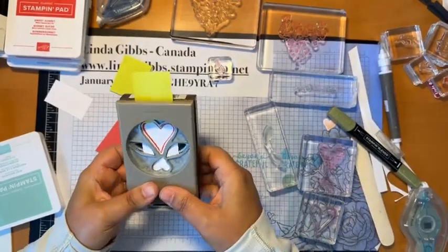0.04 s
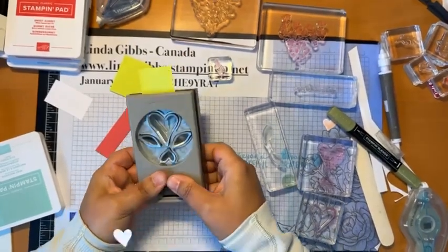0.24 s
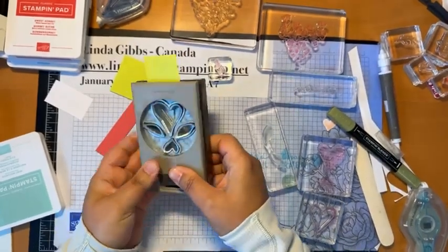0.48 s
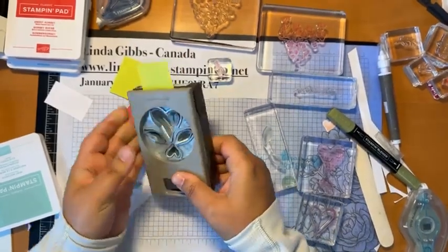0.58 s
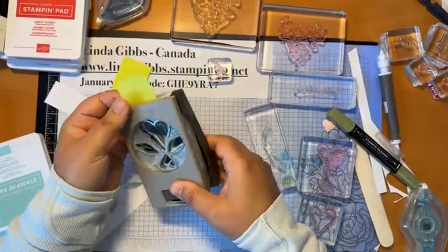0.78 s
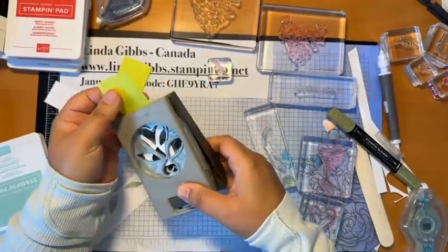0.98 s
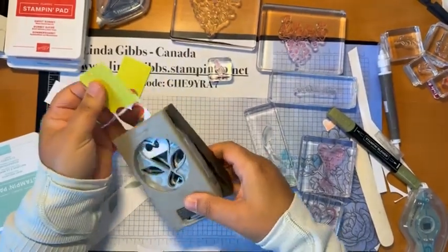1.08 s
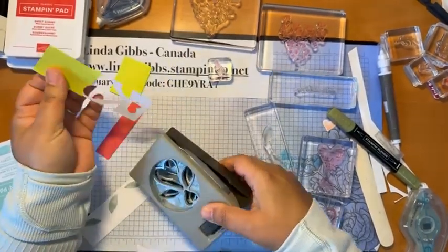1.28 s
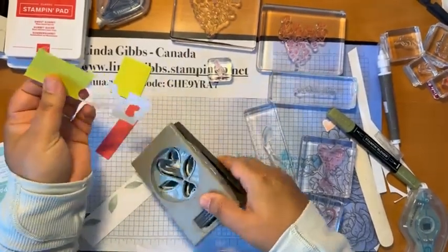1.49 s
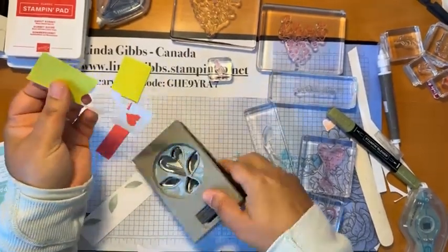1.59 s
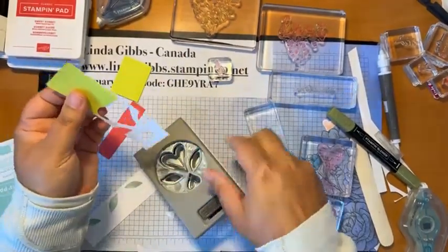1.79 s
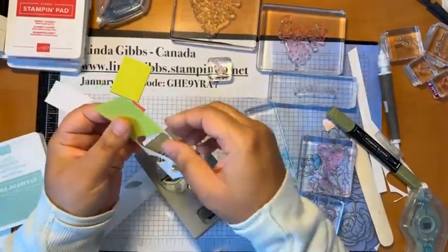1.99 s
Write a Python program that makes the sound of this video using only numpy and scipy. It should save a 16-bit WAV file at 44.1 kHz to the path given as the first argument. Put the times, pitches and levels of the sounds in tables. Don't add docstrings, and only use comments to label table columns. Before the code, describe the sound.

Close to a phone microphone in a small room, a hand punch clicks faintly and snaps hard through cardstock, card rustles out with small ticks, and the tool is set down on wood with low thuds.

```python
import sys
import numpy as np
from scipy import signal
from scipy.fft import rfft, irfft
from scipy.io import wavfile
from scipy.ndimage import uniform_filter1d

SR = 44100
rng = np.random.default_rng(int(sys.argv[2]) if len(sys.argv) > 2 else 0)


def master(y):
    cut = np.clip(np.atleast_2d(y).T, -1, 1)
    pcm = np.round(cut * 32767)
    wavfile.write(sys.argv[1], SR, pcm.astype(np.int16))


def magnitude_from_level(level_db):
    exponent = np.asarray(level_db, float) / 20
    return 10 ** exponent


N = 90404
T = np.arange(N) / SR

# pitch_hz [Hz], level_db [dB per Hz]
SNAP_COLOUR = [(80, -39), (260, -18), (600, -9), (2500, -4), (6500, -7.5), (9500, -20), (12500, -16.5),
               (16000, -20)]
# pitch_hz [Hz], level_db [dB], time to fall 60 dB t60_s [s]
BODY_TONES = [(624, -8.5, 0.036), (895.7, -2.5, 0.16), (1222, -6.5, 0.051), (1393, -4.5, .05),
              (1754, -1.5, 0.066), (2106, -6.5, 0.068), (2434, 1.5, .08), (2548, 3.5, 0.098),
              (2843, -9.5, 0.12), (3535, -4.5, 0.06), (3470, -3.5, 0.059), (3827, 0, 0.074), (5220, 0, .06),
              (7370, -15, .05)]
BODY_RING_DB = -11.5


def unit(x):
    return x / np.sqrt(np.mean(x ** 2))


def curve(table, hz):
    table = np.array(table, float)
    return np.interp(np.log(np.maximum(hz, 1)), np.log(table[:, 0]), table[:, 1])


def colour(x, table, size=2048):
    hz = np.arange(size // 2 + 1) * SR / size
    cepstrum = irfft(np.log(magnitude_from_level(curve(table, hz))))
    cepstrum[1:size // 2] *= 2
    cepstrum[size // 2 + 1:] = 0
    response = irfft(np.exp(rfft(cepstrum)))
    response = response / np.sqrt(np.sum(response ** 2))
    return signal.fftconvolve(x, response)[:len(x)]


def ring(x, tones):
    t = T[:SR // 2]
    response = np.zeros(len(t))
    for hz, db, t60 in tones:
        response += magnitude_from_level(db - 60 * t / max(t60, .005)) * np.sin(2 * np.pi * hz * t)
    return signal.fftconvolve(x, response / np.sqrt(np.sum(response ** 2)))[:N]


def band(x, hz, width):
    b, a = signal.iirpeak(hz, hz / width, SR)
    return signal.lfilter(b, a, signal.lfilter(b, a, x))


def grains(per_s, spread_db):
    chance, side, size = rng.random((3, N))
    clicks = (chance < per_s / SR) * np.sign(side - .5)
    return unit(clicks * magnitude_from_level(-spread_db * np.log(1 - size)))


def walk(count):
    step = SR // count
    turns = rng.standard_normal(N // step + 1)
    return unit(uniform_filter1d(np.repeat(turns, step)[:N], step))


def swell(s, db, rise, fall):
    return magnitude_from_level(db + 20 * np.minimum((T - s) / rise, (s - T) / fall))


def lever(bursts, spectrum, tones, ring_db):
    fall_db_s = 1900.5
    env = np.zeros(N)
    for s, db, rise_db_s, hold in bursts:
        rise = rise_db_s * np.minimum(T - s, 0)
        fall = fall_db_s * np.maximum(T - s - hold, 0)
        env += magnitude_from_level(db + rise - fall)
    slips = env * grains(per_s=22000, spread_db=1.6)
    crack = (np.arange(N) == np.argmax(env)) * np.sqrt(np.sum(env ** 2))
    return np.array([colour(x, spectrum) + magnitude_from_level(ring_db) * ring(x, tones) for x in (slips, crack)])


def background():
    floor_colour = [(30, -13), (60, -1.5), (120, 3), (400, -12), (1500, -15), (3000, -24.5), (9000, -29),
                    (16000, -36)]
    level_db = -79.5 + 1.7 * walk(count=6)
    return colour(rng.standard_normal(N), floor_colour, size=8192) * magnitude_from_level(level_db)


def shear():
    # start_s (peak) [s], level_db [dB], rise [dB per s], hold_s [s]
    tears = [
        (.004, -55, 2970, .003),
        (.0075, -39, 8874, .003),
        (.237, -43.5, 1679, 0.003),
        (.2418, -27.5, 5007, .001),
        (.2447, -22.5, 6000, 0.0037),
    ]
    near, _ = lever(tears, SNAP_COLOUR, BODY_TONES, BODY_RING_DB)
    return signal.sosfilt(signal.butter(4, 7900, fs=SR, output="sos"), near)


def creak():
    # start_s (peak) [s], level_db [dB], rise [dB per s], hold_s [s]
    creaks = [
        (.0105, -35.5, 9000, 0.004),
        (.018, -37, 4000, 0.0044),
    ]
    creak_colour = [(60, -42), (250, -6.5), (700, -9.5), (1150, 2), (2300, -3.5), (5300, -16.5),
                    (9000, -24), (16000, -25)]
    # pitch_hz [Hz], level_db [dB], time to fall 60 dB t60_s [s]
    lever_tones = [(1134, -2.5, .12), (1247, -0.5, 0.14), (1330, -10.5, 0.068), (2020, -4, 0.037),
                   (2020, -4, 0.035), (2310, -7, .04), (2465, -1.5, 0.05), (5200, -8, .04)]
    return lever(creaks, creak_colour, lever_tones, ring_db=-4)


def knocks():
    # start_s [s], level_db [dB], contact_s [s], crack_db [dB]
    contacts = [(0.012, -67, 0.0078, -86), (0.253, -71, 0.013, -64), (0.411, -70.5, 0.004, -89),
                (1.462, -57.5, 0.0065, -62), (1.47, -53, 0.0097, -74), (1.52, -57.5, 0.011, -71),
                (1.595, -49, 0.002, -49), (1.603, -34.5, 0.0035, -79), (1.614, -44, 0.002, -56),
                (1.649, -67, 0.0027, -57.5), (1.688, -82, 0.0023, -71), (1.7777, -40, 0.0026, -32),
                (1.783, -28, 0.003, -41.5), (1.795, -61, 0.0038, -37.5), (1.813, -36, 0.0046, -45.5),
                (1.832, -36.5, 0.0035, -42.5), (1.859, -51.5, 0.00088, -51), (1.892, -77, 0.0021, -57)]
    # pitch_hz [Hz], level_db [dB], time to fall 60 dB t60_s [s]
    table_tones = [(69.4, -19.5, 0.073), (91, -21, 0.022), (115, -3, 0.045), (142, -4.5, 0.24),
                   (177, -1, 0.062), (211, -2, 0.095), (257, 3, 0.048), (333, -4, 0.095),
                   (450, -0.5, 0.083), (536, -4.5, 0.11), (718.7, -6, 0.11), (930, -0.5, 0.064)]
    crack_colour = [(150, -9.5), (350, 0.5), (750, -6), (1300, -16.5), (4000, -25), (6500, -34),
                    (9000, -53.5), (16000, -59)]
    push, crack = np.zeros(N), np.zeros(N)
    for s, db, contact, crack_db in contacts:
        phase = np.clip((T - s) / max(contact, .0005), 0, 1)
        push += magnitude_from_level(db) * np.sin(np.pi * phase) ** 2
        crack += swell(s, crack_db, rise=.002, fall=.08 / 3)
    rough = crack * grains(per_s=6100, spread_db=1.0)
    return ring(push, table_tones) + colour(rough, crack_colour)


def rub():
    # start_s (peak) [s], level_db [dB], swell_s [s], fade_s [s], brightness [0-1]
    strokes = [(.145, -68, 0.044, 0.054, 0.56), (0.2, -58.5, 0.021, 0.13, 0.54),
               (0.494, -59, 0.0097, 0.11, 0.9), (0.537, -63, 0.0088, 0.041, 0.17),
               (0.651, -74, 0.027, 0.037, 0.97), (0.733, -58, 0.079, 0.051, 0.96),
               (0.868, -62, 0.054, 0.13, 0.48), (0.933, -52.5, 0.05, 0.032, 0.91),
               (0.985, -55.5, 0.015, 0.044, 0.1), (1.087, -58, 0.065, 0.17, 0.93),
               (1.14, -57, 0.037, 0.078, 0.67), (1.259, -64.5, 0.019, 0.061, 0.21),
               (1.291, -68, 0.051, 0.063, 0.98), (1.358, -62.5, 0.058, 0.037, 0.69),
               (1.435, -74.5, 0.01, 0.044, 0.93), (1.584, -68, 0.005, 0.11, 0.84),
               (1.772, -67.5, 0.056, 0.071, 0.51), (1.918, -68, 0.0051, 0.043, 0.45),
               (1.969, -71, 0.013, 0.12, 0)]
    rub_colour = [(100, -5.5), (900, -2.5), (2000, 0.5), (3200, 0.5), (6500, -2), (9800, -6), (12500, -2.5),
                  (15800, -9)]
    # pitch_hz [Hz], width_hz [Hz], level_db [dB]
    slot_peaks = [
        (1900, 1800, -15),
        (4620, 3000, -8.5),
        (6000, 280, -20),
    ]
    scrape = grains(per_s=9000, spread_db=2.5)
    plain = colour(scrape, rub_colour)
    peaks = []
    for hz, width, db in slot_peaks:
        wander = magnitude_from_level(db + 0.86 * walk(count=9))
        peaks.append(unit(band(scrape, hz, width)) * wander)
    high, low = np.zeros(N), np.zeros(N)
    for s, db, rise, fade, brightness in strokes:
        env, share = swell(s, db, rise, fade), np.clip(brightness, 0, 1)
        high += env * share
        low += env * (1 - share)
    bright = plain + sum(peaks[1:])
    dull = signal.sosfilt(signal.butter(2, 6000, fs=SR, output="sos"), plain) + 2 * peaks[0]
    flicker = magnitude_from_level(1.3 * walk(count=60))
    return (high * bright + low * dull) * flicker


def snap():
    # start_s (peak) [s], level_db [dB], rise [dB per s], hold_s [s]
    breaks = [
        (.234, -56, 1500, .008),
        (.2495, -15.5, 5000, 0.00064),
        (.2511, -13.5, 6000, 0.0006),
        (.2575, -27, 6000, 0.00057),
        (.2618, -27, 6000, .0005),
        (.2657, -24, 6000, 0.00059),
        (.2745, -25.5, 5000, 0.0023),
    ]
    return lever(breaks, SNAP_COLOUR, BODY_TONES, BODY_RING_DB)


def ticks():
    catches = [(0.4883, -41.5, 6000), (.4954, -48, 4860), (.5034, -43.5, 6880), (0.5349, -46.5, 1447),
               (0.5426, -56, 1390), (.5544, -50, 4880), (0.594, -50.5, 5320), (0.642, -51.5, 6760),
               (.656, -55, 5200), (.6833, -53, 5470), (.847, -56, 1800), (.9118, -44.5, 4700),
               (1.0864, -48, 5330), (0.7325, -53, 1860), (0.9347, -47, 1550), (1.1334, -47, 1900),
               (1.1404, -40.5, 1900), (1.2565, -46.5, 1830), (1.2575, -58, 3306), (1.3577, -45, 5310)]
    out, t = np.zeros(N), T[:SR // 40]
    for s, db, hz in catches:
        burst = rng.standard_normal(len(t)) * magnitude_from_level(-60 * t / .015)
        click = band(burst, hz, width=hz * .5)
        i = int(s * SR)
        out[i:i + len(t)] += click / np.abs(click).max() * magnitude_from_level(db - 2)
    return out


def squeaks():
    rubs = [
        (.73, -69, 1763, 0.17, 0.15),
        (.865, -68, 1845, 0.084, 0.1),
        (1.11, -62, 5200, 0.11, .08),
        (1.14, -67.5, 2230, 0.085, .1),
        (1.14, -63, 370.5, 0.01, 0.06),
        (1.257, -75, 326.5, 0.035, 0.1),
        (1.975, -70.5, 4370, 0.037, 0.082),
        (1.969, -72, 2105, .02, 0.12),
    ]
    noise = rng.standard_normal(N)
    return sum(swell(s, db, rise, fall) * unit(band(noise, hz, hz / 12)) for s, db, hz, rise, fall in rubs)


def corners():
    touches = [(1.456, -66, 2190, 1990, .1), (1.4585, -52.5, 882, 201.8, 0.19), (1.46, -57, 450, 403, 0.18),
               (1.493, -68, 900, 252, 0.064), (1.503, -72.5, 930, 200, 0.065),
               (1.595, -57, 1310, 1090, 0.2), (1.7756, -49, 2200, 900, .06), (1.78, -46, 3994, 2000, 0.036),
               (1.796, -57.5, 2600, 1200, 0.064), (1.822, -53, 1995, 900, 0.067),
               (1.96, -66, 590, 704, 0.41)]
    noise = rng.standard_normal(N)
    out = np.zeros(N)
    for s, db, hz, width, t60 in touches:
        out += swell(s, db, rise=.002, fall=t60 / 3) * unit(band(noise, hz, width))
    return out


def hum():
    hums = [
        (1.733, -50, 110, 0.049, 0.071),
        (1.949, -47, 115, 0.036, 0.1),
        (1.993, -55, 115, 0.02, 0.031),
    ]
    return sum(swell(s, db, rise, fall) * np.sin(2 * np.pi * hz * T) for s, db, hz, rise, fall in hums)


def room(x):
    room_t60 = [(100, 0.27), (500, 0.27), (1000, 0.3), (6000, 0.31), (15000, 0.22)]
    delay_s = 0.0034
    t = T[:SR // 2]
    tail = np.zeros(len(t))
    for hz in 60 * 2. ** np.arange(0, 8.1, .5):
        sos = signal.butter(2, [hz / 2 ** .25, hz * 2 ** .25], "band", fs=SR, output="sos")
        noise = signal.sosfilt(sos, rng.standard_normal(len(t)))
        tail += noise * magnitude_from_level(-60 * t / curve(room_t60, hz))
    tail = tail * np.clip(t / delay_s - .5, 0, 1)
    return signal.fftconvolve(x, tail / np.sqrt(np.sum(tail ** 2)))[:N]


def scene():
    punch, punch_crack = creak() + snap()
    card = shear() + rub() + ticks() + squeaks()
    table = knocks() + corners() + hum()
    walls = room(magnitude_from_level(-6.5) * punch_crack + magnitude_from_level(-7) * card + magnitude_from_level(-9) * table)
    return (punch + card + table + walls + background())[None]


def low_pass(x):
    return signal.sosfilt(signal.butter(12, 15950, fs=SR, output="sos"), x)


def record(dry):
    ceiling, fade_out_s = .9, 0.0055
    x = ceiling * np.tanh(dry / ceiling)
    x = signal.sosfilt(signal.butter(4, 66, "high", fs=SR, output="sos"), x)
    x = signal.sosfilt(signal.ellip(10, .2, 70, 15900, fs=SR, output="sos"), x)
    x = x * np.clip((T[-1] - T) / fade_out_s, 0, 1)
    return low_pass(x)


dry = scene()
out = record(dry)
master(out)
```